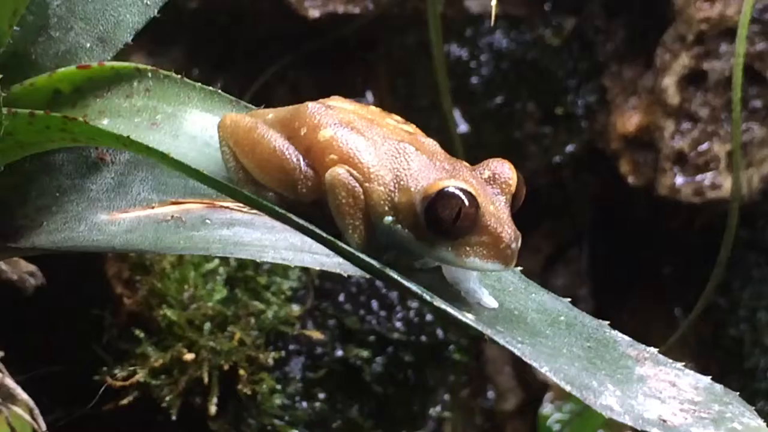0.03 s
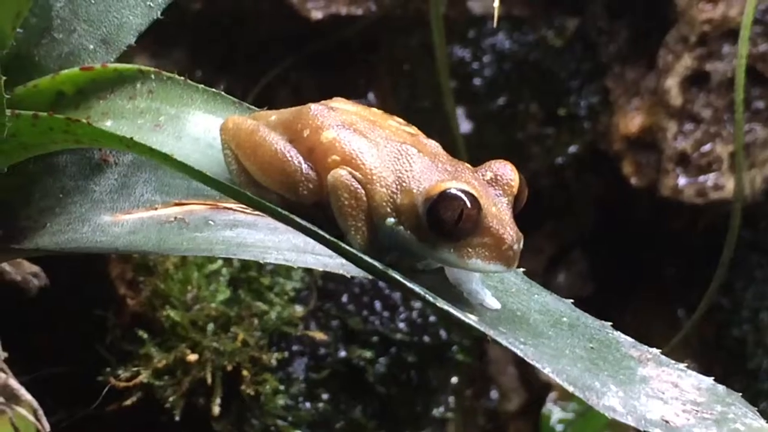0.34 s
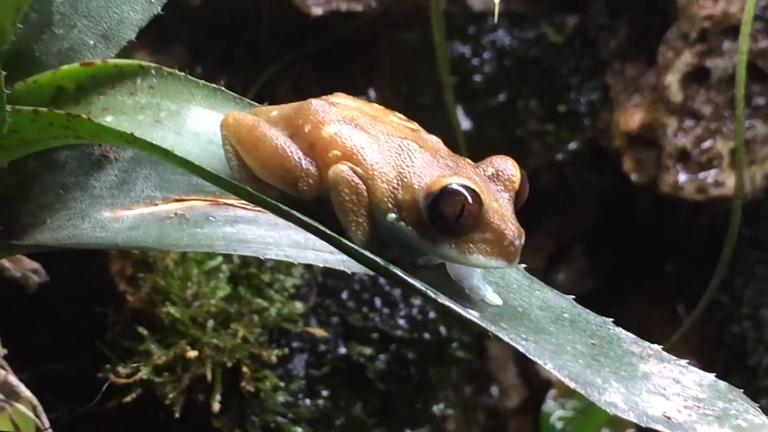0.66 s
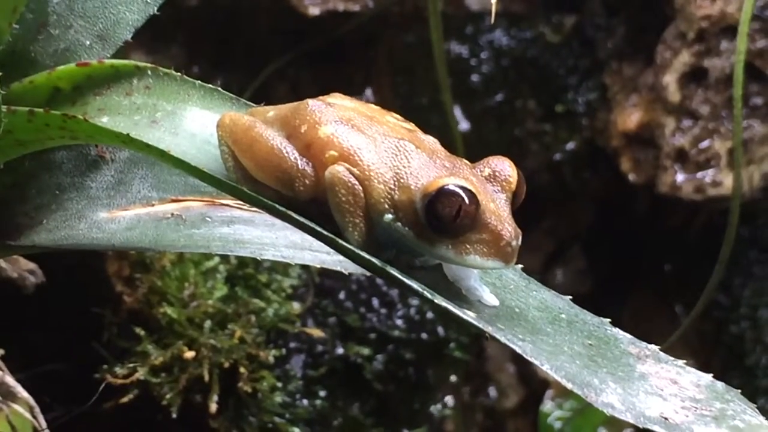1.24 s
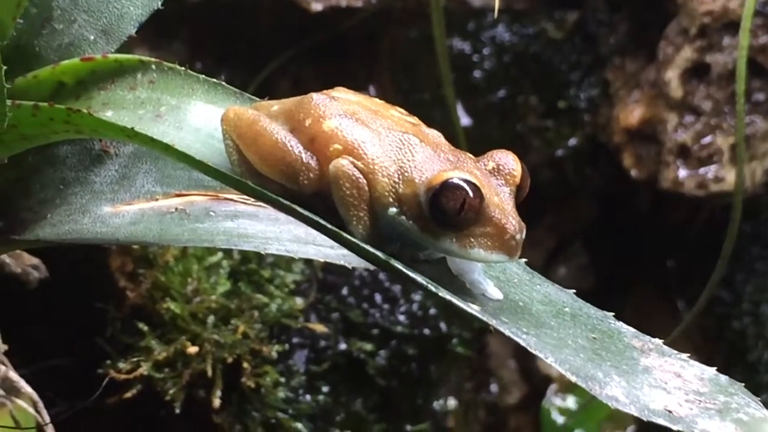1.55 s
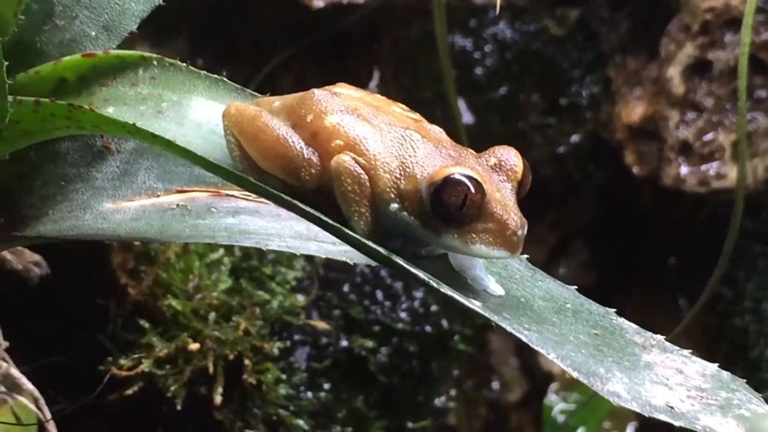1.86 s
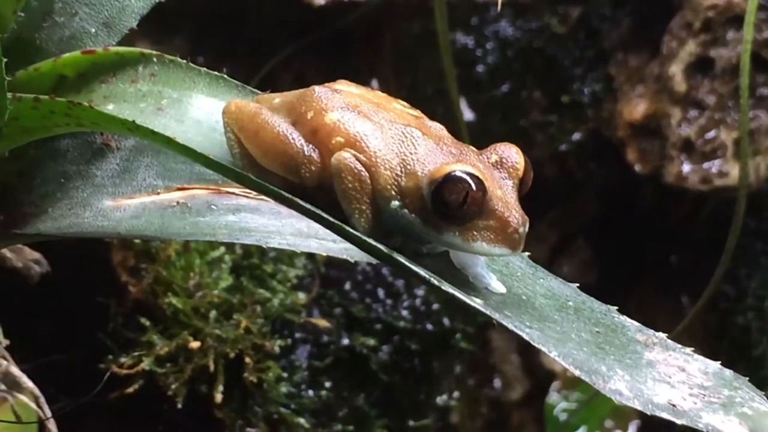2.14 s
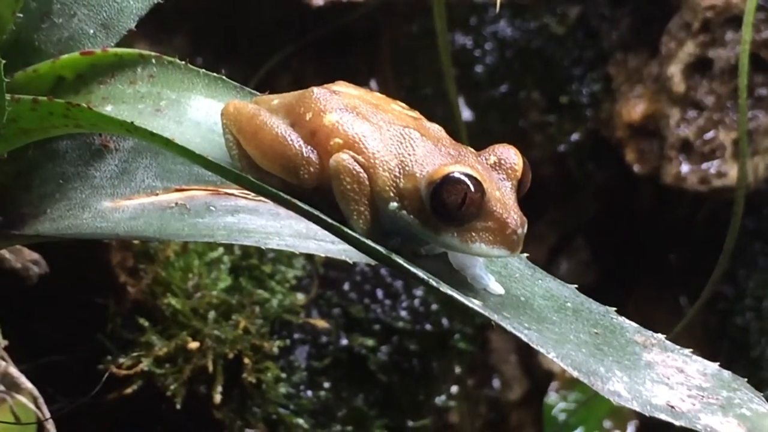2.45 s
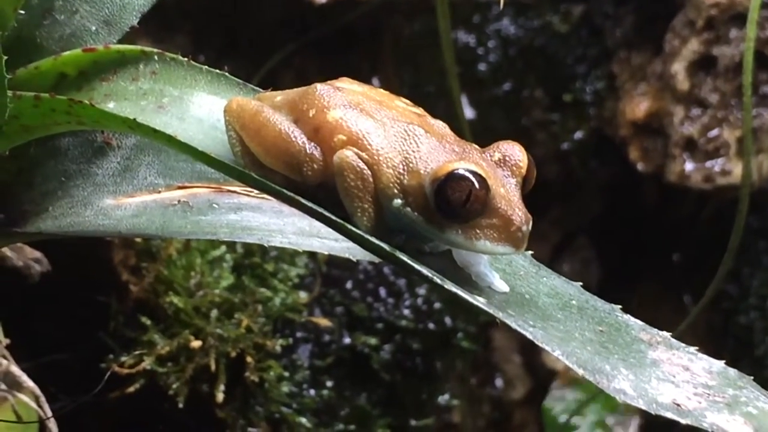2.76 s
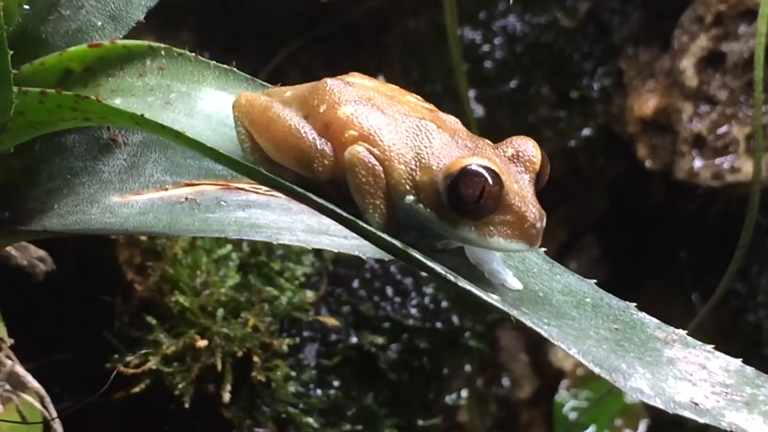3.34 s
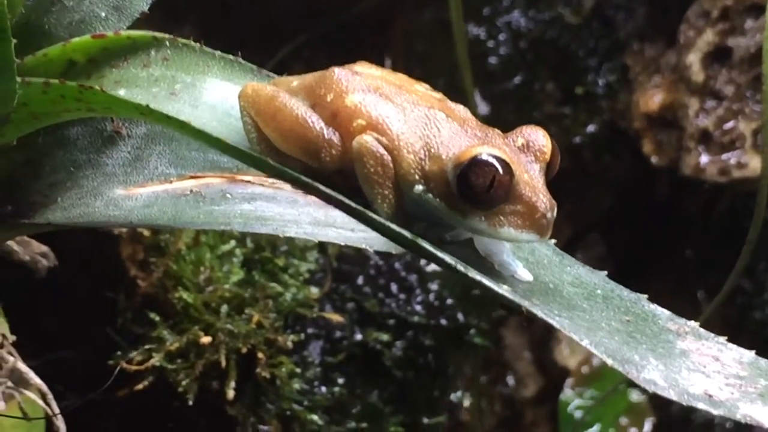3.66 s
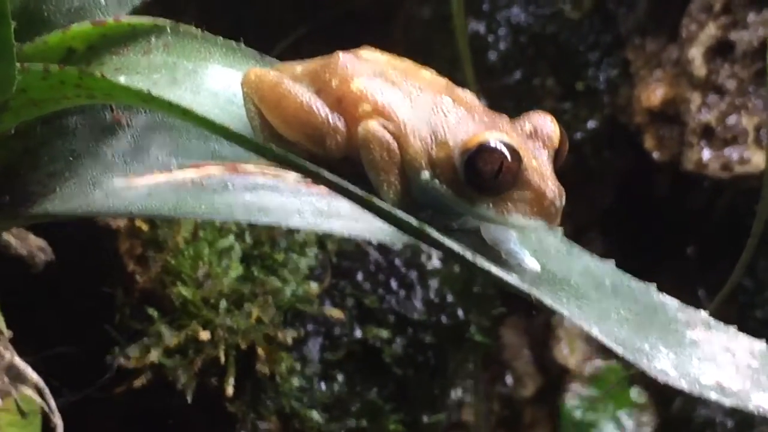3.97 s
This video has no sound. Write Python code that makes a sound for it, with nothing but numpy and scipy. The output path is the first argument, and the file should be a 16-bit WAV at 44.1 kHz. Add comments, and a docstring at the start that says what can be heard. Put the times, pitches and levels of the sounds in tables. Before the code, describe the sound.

Close, continuous trickling water patters in tiny high drops inside a small glass enclosure. A single sharp plop stands out after about a second, then the dripping carries on over a low, steady pump hum.

```python
"""Small bright drops tick close by as water trickles down the rock wall of a glass terrarium.
Each impact slaps the wet surface, throws a fine spray and traps a bubble that rings as a damped
oscillator; one fat drip plops into the pool. The panes add short reflections to the water.
Underneath, a mains pump hums, knocks and rattles softly in forced vibration, over faint room air."""
import sys
import numpy as np
from scipy import signal
from scipy.fft import rfft, irfft
from scipy.io import wavfile

SR = 44100
rng = np.random.default_rng(int(sys.argv[2]) if len(sys.argv) > 2 else 0)


def generate_wav(signal):
    """Clip the signal to [-1, 1] and save it as 16-bit WAV at the path in sys.argv[1]."""
    frames = np.transpose(np.atleast_2d(signal))
    scaled = np.clip(frames, -1, 1) * 32767
    pcm = np.round(scaled).astype(np.int16)
    wavfile.write(sys.argv[1], SR, pcm)


N = 176400

# near drops: t/s, base level/dB, bubble f/Hz, slap offset/dB, spray offset/dB
NEAR_DROPS = [(0.1194, -42.5, 5360, 0, -4), (0.1473, -40.5, 6860, -24, 3), (0.1965, -37.5, 2230, -14, -26),
              (0.3086, -30.5, 7630, -15.5, -0.5), (0.3704, -39, 5570, -18, -6),
              (0.3934, -30, 6190, -21, -11), (0.403, -39, 7240, -25, 6), (0.4338, -37.5, 10550, -29, 1.5),
              (0.4805, -51.5, 4850, 3, -13), (0.556, -53, 2270, -17, -7), (0.5637, -35, 10400, -27, 2),
              (0.5694, -42, 6840, -9, 0), (0.59, -47.5, 3360, -16, 0), (0.601, -38, 12030, -28, -9),
              (0.631, -50, 3900, -5, 11.5), (0.72, -47.5, 2950, -4, -16), (0.7396, -36.5, 6600, -14, -7),
              (0.8017, -40, 12200, 0, 14), (0.8577, -37, 9950, -13, 1), (0.8754, -31.5, 9820, -27, 1),
              (0.882, -29, 6020, -11.5, -5.5), (0.8986, -32.5, 6600, -9, -19),
              (0.918, -45.5, 4840, -3, -16), (0.951, -42.5, 6170, -3.5, 0), (1.0568, -34.5, 9620, -8, -2),
              (1.061, -49, 5730, 0, -8), (1.0952, -37, 2490, -8, -28), (1.146, -46, 2460, -2, -24),
              (1.1861, -38, 6490, -25, -4), (1.2357, -41.5, 8640, -29, 2), (1.401, -31.5, 6220, -25, -8),
              (1.4211, -39, 6630, -2, -3), (1.5077, -36, 4420, -6, -2.5), (1.5244, -35, 5490, -26, -21),
              (1.546, -39.5, 7120, -23, -13), (1.609, -37.5, 6170, -26, -27),
              (1.6479, -43.5, 3640, 7.5, -12), (1.8179, -44, 7220, 2, 2), (1.8807, -38, 13000, -25, 4),
              (1.8946, -38, 7900, -28, -7), (1.9036, -40, 13100, -11, -3), (2.0172, -41, 7400, -3, 1),
              (2.032, -40, 12190, -14, -4), (2.067, -42, 6850, -15, -2), (2.075, -41.5, 5300, 4, -7),
              (2.1513, -35.5, 9340, -7.5, -1), (2.3003, -42.5, 9750, -6, -8), (2.3545, -38, 10300, -8, -12),
              (2.3745, -34, 7230, -18, -0.5), (2.3796, -27.5, 5500, -27, -15), (2.5023, -33, 7910, -31, 10),
              (2.5492, -38, 3860, -0.5, 0), (2.5975, -34.5, 6600, -7, -4), (2.602, -26, 6010, -13, -0.5),
              (2.6162, -40, 6750, -24, 2), (2.672, -38.5, 5950, -5.5, -16), (2.7767, -45, 11180, -22, -6),
              (2.79, -31, 9860, -18, -7), (2.799, -35, 11850, -13, -10), (2.8376, -30, 10300, -8.5, -3),
              (2.8522, -43, 1860, -5, -14), (2.9222, -26, 6710, -6, -1), (2.9479, -40, 9100, -1, 9.5),
              (3.063, -29.5, 13270, -28, -8), (3.0708, -34, 7070, -17, -7), (3.093, -49, 1550, 9, -5.5),
              (3.1939, -37, 8500, -1.5, -8), (3.2635, -40, 12300, -29, -18), (3.2849, -35, 4140, 3, 1),
              (3.292, -40, 11040, -15, 6), (3.3485, -42.5, 11760, -19, -6), (3.5012, -35, 7400, -4, 0),
              (3.51, -45, 4070, 2, -15), (3.5172, -28.5, 6100, 1, -17), (3.5281, -47.5, 1250, -15, -19),
              (3.545, -29, 6980, -15, -8), (3.5696, -41, 5400, -3, -19), (3.586, -49, 3810, 10, -7),
              (3.5946, -29, 3830, 2.5, 2), (3.6681, -39, 3110, 5, -14), (3.6794, -35, 5850, 2.5, -22),
              (3.6946, -27, 10850, -14, -2), (3.7312, -39, 12300, -5, -13), (3.7723, -30.5, 6370, -5, -10),
              (3.7907, -34, 13290, -21, -7), (3.8513, -35.5, 13000, -23, -17),
              (3.8691, -32.5, 8150, -24, -8), (3.882, -40, 4570, -8, -6), (3.9076, -45.5, 3600, -4, -2),
              (3.9357, -35, 9670, -9.5, -21)]
# bubbles of the fat drip: t/s, level/dB, starting f/Hz, relative pitch rise/(1/s), t60/s
PLOP_BUBBLES = [(1.2759, -13, 2716, 31, 0.012), (1.2760, -27.5, 6260, 8, 0.0084),
                (1.2796, -29, 4010, 14, 0.014)]
# flow of the trickle: t/s, level offset/dB
TRICKLE_FLOW = [(0, -2), (.7, -0.5), (1.3, 1.5), (1.9, 1.5), (2.5, 2), (3.1, -0.5), (3.6, 0), (4, 1)]
# reflections from the panes: delay t/s, level/dB
PANE_ECHOES = [(.0012, -16), (.0027, -15.5), (.0046, -12)]
# mains harmonics of the pump: f/Hz, nominal starting level/dB
HUM_HARMONICS = [(120, -55.5), (180, -48)]
# modes of the pump housing: f/Hz, level/dB, t60/s
HOUSING_MODES = [(495.6, -57, 0.041), (605, -46, 0.016), (965, -56, 0.027)]
# spectrum of the pump's rattle: f/Hz, relative density level/dB
RATTLE_SPECTRUM = [(150, -19), (300, 2), (420, -6), (600, -7), (850, 3), (1100, 1.5), (1400, 1),
                   (1700, -13), (4000, -6)]
# spectrum of the room air and the running water film: f/Hz, relative density level/dB
AIR_SPECTRUM = [(25, -9), (58, 8), (100, 0.5), (155, 9.5), (230, -2), (300, 0), (400, -4.5), (700, -6.5),
                (1100, -17), (1400, -7), (1650, -20), (2200, -11.5), (4000, -23), (8000, -25.5),
                (15000, -42)]

BUBBLE_DB, SPLASH_DB, SLAP_DB, SPRAY_DB = 4, -6, -7.5, -4  # added to a drop's base level
BUBBLE_REF_HZ, BUBBLE_REF_T60_S, BUBBLE_TILT_DB_PER_OCTAVE = 2950, 0.016, 0.5
BUBBLE_MAX_RISE_PER_S = 5.2
SPLASH_T60_S, NOISE_ATTACK_S = 0.016, 0.00033
SLAP_HZ, SLAP_OCTAVES, SLAP_T60_S = 3780, 0.86, 0.031
SPRAY_HZ, SPRAY_SCATTER_OCTAVES = 10930, 0.12
TAIL_DB, TAIL_T60_S = -12.5, 0.043
MAINS_HZ, HUM_WAVER_DB, HUM_SWELL_DB_PER_S = 60, 1, 0.05
KNOCK_LAG_S, KNOCK_SCATTER_DB = 0.0003, 1.6
START_S, TOP_HZ = 0.119, 15500


def drops():
    """Impact excitation: each near drop rings a bubble and radiates a splash, a slap and a high spray."""
    out = np.zeros(N)
    for at, db, hz, slap_db, spray_db in NEAR_DROPS:
        add(out, at, undb(db + BUBBLE_DB) * bubble(hz, rng.random() * BUBBLE_MAX_RISE_PER_S))
        add(out, at, undb(db + SPLASH_DB) * splash(hz, octaves=0.3, t60=SPLASH_T60_S))
        add(out, at, undb(db + slap_db + SLAP_DB) * splash(SLAP_HZ, SLAP_OCTAVES, SLAP_T60_S))
        spray_hz = SPRAY_HZ * 2 ** (SPRAY_SCATTER_OCTAVES * rng.standard_normal())
        add(out, at, undb(db + spray_db + SPRAY_DB) * splash(spray_hz, octaves=0.8, t60=SPLASH_T60_S))
    return out


def bubble(hz, rise):
    """Bubble resonance: trapped air is the spring, water the mass; small ones ring higher and shorter."""
    gain = undb(BUBBLE_TILT_DB_PER_OCTAVE * np.log2(hz / BUBBLE_REF_HZ))
    t60 = BUBBLE_REF_T60_S * np.sqrt(BUBBLE_REF_HZ / hz)
    return gain * ring(hz, rise, t60, attack=0.00027)


def ring(hz, rise, t60, attack):
    """Damped oscillation: a tone builds and decays while its frequency climbs by rise * hz a second."""
    t = np.arange(int(t60 * SR)) / SR
    phase = 2 * np.pi * hz * (t + rise * t * t / 2)
    return np.sin(phase) * fade(t, t60) * (1 - np.exp(-t / attack)) ** 2


def splash(hz, octaves, t60):
    """A brief impact has a broad spectrum: a decaying burst of noise in a band around one frequency."""
    t = np.arange(2048) / SR
    f = np.maximum(np.fft.rfftfreq(len(t), 1 / SR), 1)
    band = 1 / (1 + (np.log2(f / hz) / octaves) ** 2 / 2) ** 2
    burst = irfft(rfft(rng.standard_normal(len(t))) * band)
    return burst / burst.std() * fade(t, t60) * (1 - np.exp(-t / NOISE_ATTACK_S))


def fat_drip():
    """Air entrainment: one heavy drip slaps the pool and traps bubbles that chirp upward."""
    out = np.zeros(N)
    add(out, PLOP_BUBBLES[0][0], undb(-33) * splash(SLAP_HZ, SLAP_OCTAVES, SLAP_T60_S))
    for at, db, hz, rise, t60 in PLOP_BUBBLES:
        add(out, at, undb(db) * ring(hz, rise, t60, attack=0.00031))
    return out


def trickle():
    """Superposition of many small impacts: ticks of spray, duller patter on moss and a faint gurgle."""
    ticks = shower(per_s=100, db=-55.5, spread_db=6.5, low_hz=6480, high_hz=17300)
    patter = shower(per_s=70, db=-58, spread_db=3.5, low_hz=1940, high_hz=6750)
    gurgle = shower(per_s=40, db=-61, spread_db=2, low_hz=870, high_hz=2430)
    out = np.zeros(N)
    for impacts, octaves, t60 in [(ticks, 0.63, SPLASH_T60_S), (patter, 0.34, SLAP_T60_S),
                                  (gurgle, 0.37, SLAP_T60_S)]:
        for at, gain, hz in impacts:
            add(out, at, gain * splash(hz, octaves, t60))
    return out


def shower(per_s, db, spread_db, low_hz, high_hz):
    """A random point process: impacts whose level follows the flow, as rows of t/s, gain, f/Hz."""
    gap_draw, level_draw, pitch_draw = rng.random((800, 3)).T
    times = np.cumsum(0.5 - 0.5 * np.log(gap_draw)) / per_s
    flow_db = np.interp(times, *np.array(TRICKLE_FLOW).T)
    scatter_db = spread_db * np.minimum(-np.log(level_draw) - 1, 2)
    hz = low_hz * (high_hz / low_hz) ** pitch_draw
    return np.column_stack([times, undb(db + flow_db + scatter_db), hz])[times < N / SR]


def tank():
    """Impulse response of the enclosure: direct sound, reflections from the panes and a diffuse tail."""
    t = np.arange(SR // 10) / SR
    response = rng.standard_normal(len(t)) * fade(t, TAIL_T60_S) * (t > PANE_ECHOES[0][0])
    response *= undb(TAIL_DB) / np.linalg.norm(response)
    response[0] = 1  # direct sound
    for lag, db in PANE_ECHOES:
        response[int(lag * SR)] += undb(db)
    return response


def pump_hum():
    """Forced vibration at harmonics of the mains; each wavers in level and grows slightly louder."""
    t, out = np.arange(N) / SR, np.zeros(N)
    for hz, db in HUM_HARMONICS:
        waver = np.interp(t, np.linspace(0, N / SR, 32), rng.standard_normal(32))
        rms = undb(db + HUM_SWELL_DB_PER_S * t + HUM_WAVER_DB * waver)
        out += np.sqrt(2) * rms * np.sin(2 * np.pi * hz * t)
    return out


def pump_knocks():
    """Modal ringing: the housing is knocked once a mains cycle, with uneven strength."""
    knock, out = np.zeros(SR // 10), np.zeros(N)
    for hz, db, t60 in HOUSING_MODES:
        add(knock, KNOCK_LAG_S, undb(db) * ring(hz, rise=0, t60=t60, attack=0.00043))
    for at in np.arange(0, N / SR, 1 / MAINS_HZ):
        add(out, at, undb(KNOCK_SCATTER_DB * rng.standard_normal()) * knock)
    return out


def pump_rattle():
    """Amplitude-modulated noise: a faint rattle rises and decays after each knock."""
    age = (np.arange(N) / SR - KNOCK_LAG_S) % (1 / MAINS_HZ)
    envelope = fade(age, t60=0.042) * (1 - np.exp(-age / NOISE_ATTACK_S))
    return undb(-59.5) * noise(RATTLE_SPECTRUM) * envelope


def room_air():
    """Stationary broadband noise from the room air and the running water film."""
    return undb(-59.5) * noise(AIR_SPECTRUM)


def noise(points):
    """Spectral shaping: noise of unit rms that follows points of f/Hz, level/dB."""
    hz, db = np.array(points, float).T
    f = np.maximum(np.arange(N // 2 + 1) * SR / N, 1)
    shape = undb(np.interp(np.log(f), np.log(hz), db))
    shaped = irfft(rfft(rng.standard_normal(N)) * shape, N)
    return shaped / shaped.std()


def fade(t, t60):
    """Exponential decay, by 60 dB in t60 seconds."""
    return np.exp(-np.log(1000) * t / t60)


def undb(db):
    """Amplitude ratio of a level in decibels."""
    return 10 ** (np.asarray(db) / 20)


def add(out, at, sound):
    """Linear superposition of a sound that starts at a given time."""
    i = int(np.clip(at * SR, 0, N - 1))
    out[i:i + len(sound)] += sound[:N - i]


def scene():
    """Convolution places the water in the tank; the pump and the room air add to it directly."""
    background = pump_hum() + pump_knocks() + pump_rattle() + room_air()
    water = signal.fftconvolve(tank(), fat_drip() + drops() + trickle())[:N]
    return (water + background)[None]


def record(dry):
    """Gating and band limiting: a moment of silence comes first, and a low-pass cuts the top treble."""
    opened = np.arange(N) / SR > START_S
    lowpass = signal.ellip(8, 0.2, 70, TOP_HZ, fs=SR, output="sos")
    return signal.sosfilt(lowpass, dry * opened)


dry = scene()
out = record(dry)
generate_wav(out)
```